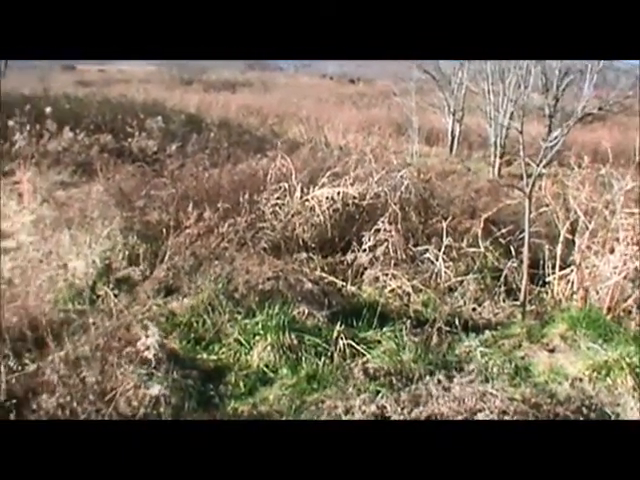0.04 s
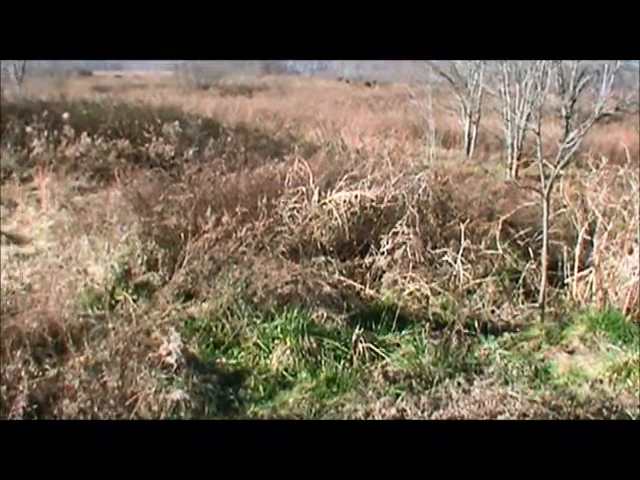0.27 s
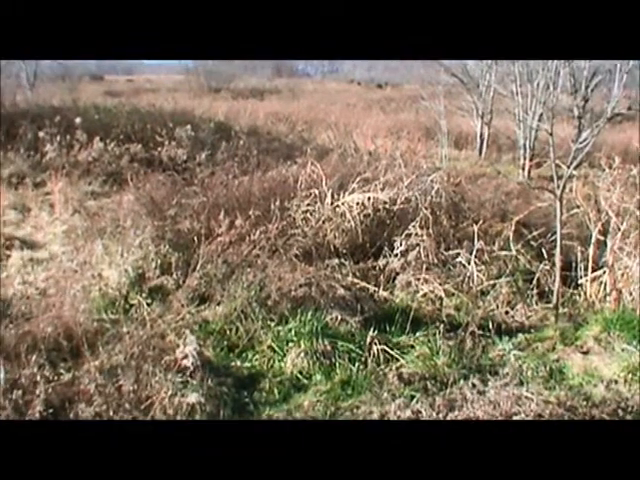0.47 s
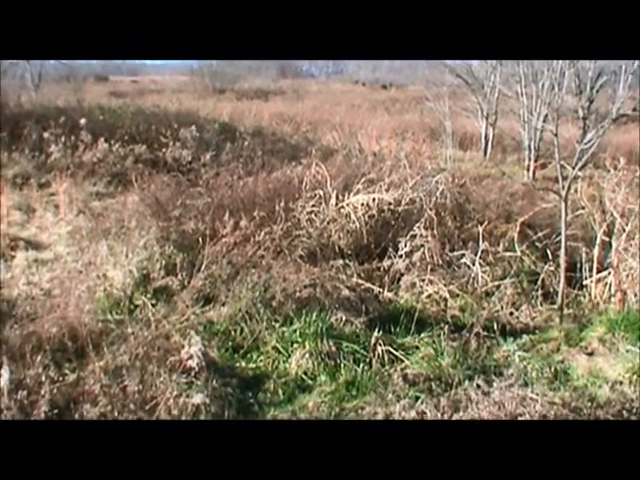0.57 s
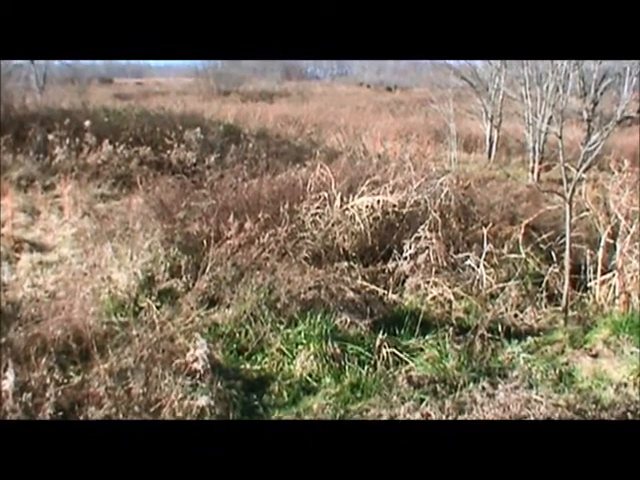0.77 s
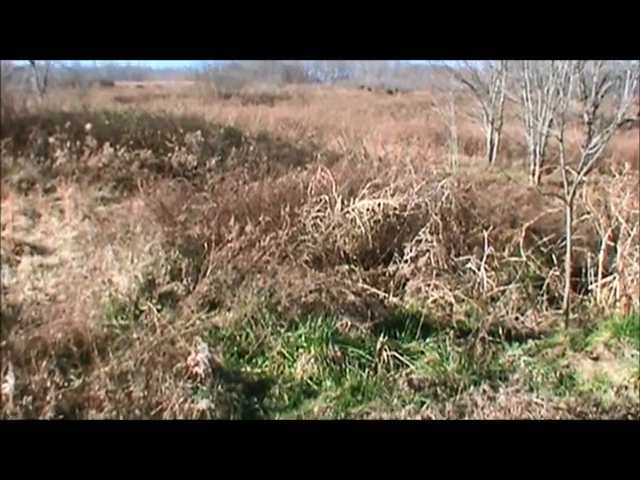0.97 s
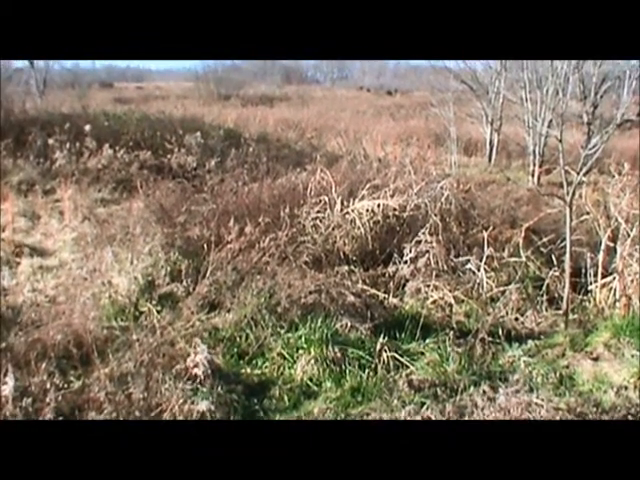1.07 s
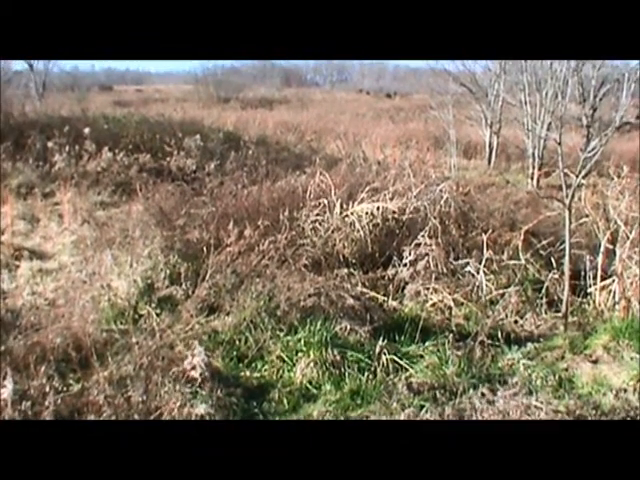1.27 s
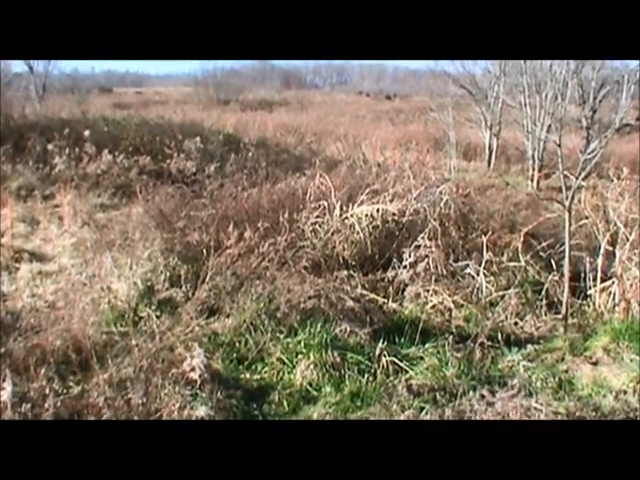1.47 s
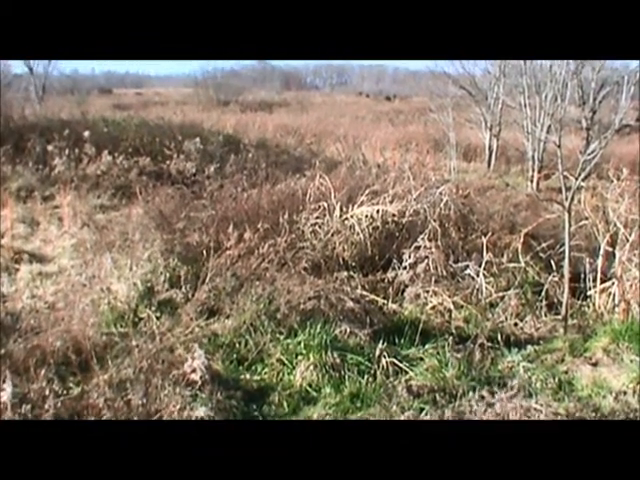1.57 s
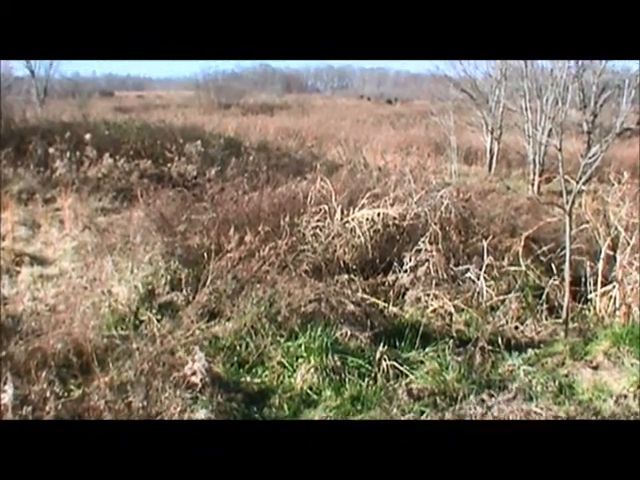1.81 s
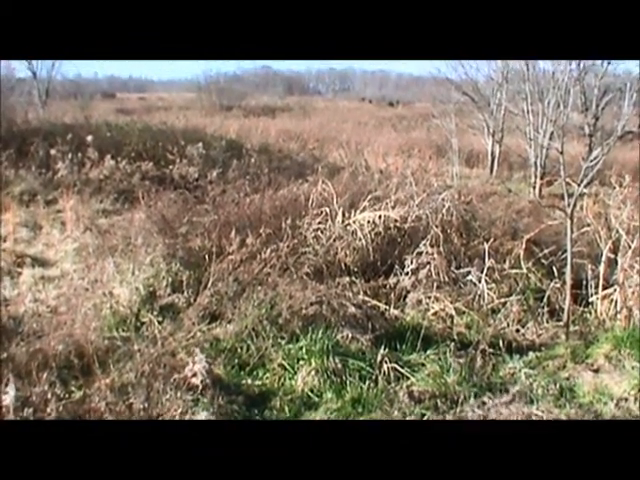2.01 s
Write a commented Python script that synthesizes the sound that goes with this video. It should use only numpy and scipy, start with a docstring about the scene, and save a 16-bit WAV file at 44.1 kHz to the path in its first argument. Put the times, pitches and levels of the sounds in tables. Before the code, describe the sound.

A long hound bawl leads, a rough second dog breaks in, then after a brief lull both bay together twice. Small metal bells clink nearby; outdoor stereo microphone with soft wind, dry grass and faint echo.

```python
"""Two hounds in an open field

Two hounds bay as they work through brush: harmonics and air pulses, filtered by throat and mouth humps.
One holds clear, slowly sinking bawls; the other breaks in with short, hoarse chops.
Collar bells and tags clink as decaying modes; a far bird and soft low thumps are gliding tones.
Shaped noise makes rustling grass and wind on the microphone; scattered taps return a faint echo."""
import sys
import numpy as np
from scipy import signal
from scipy.fft import rfft, irfft
from scipy.io import wavfile

SR = 44100
rng = np.random.default_rng(int(sys.argv[2]) if len(sys.argv) > 2 else 0)


def to_wav(s):
    """Save 16-bit WAV."""
    ch = np.atleast_2d(s).T  # columns
    pcm = np.round(np.clip(ch, -1, 1) * 32767)  # PCM
    wavfile.write(sys.argv[1], SR, pcm.astype(np.int16))


N = 90404  # length [samples]

JITTER_HZ = 130  # rate of the random changes in voices and bells
ATTACK_S, RELEASE_S = .003, .009  # linear ramps of a call; bells rise in half the attack
CLINK_HZ = (4400, 13500)  # band of the clapper ticks and the tag partials
RING_T60_S = .095  # 60 dB decay time of small metal


def amp(db):
    """Decibels are a logarithmic measure: 20 dB is a factor of ten in amplitude."""
    return 10 ** (np.asarray(db) / 20)


def unit(x):
    """Normalization to unit root mean square."""
    return x / np.sqrt(np.mean(x ** 2) + 1e-20)


def add(mix, s, sound):
    """Superposition: the sound sums into the mix from s seconds on."""
    part = mix[max(round(s * SR), 0):][:len(sound)]
    part += sound[:len(part)]


def decay(t, t60):
    """Exponential damping: a fall of 60 dB in t60 seconds."""
    return np.exp(-np.log(1000) * t / t60)


def per_bin(points, **ends):
    """Interpolation on a logarithmic frequency axis, read at every spectral bin."""
    hz, value = np.transpose(points)
    bins_hz = np.fft.rfftfreq(N, 1 / SR)
    return np.interp(np.log(bins_hz + 1), np.log(hz + 1), value, **ends)


def drift(n, hz):
    """Low-pass random modulation: noise under a Gaussian spectrum of width hz."""
    lowpass = np.exp(-(np.fft.rfftfreq(N, 1 / SR) / hz) ** 2)
    return unit(irfft(rfft(rng.standard_normal(N)) * lowpass, N))[:n]


def tract(hz, throat_db, mouth_hz, mouth_db, treble_db):
    """Source-filter principle: gain at hz of the throat and mouth resonances and the treble above them."""
    treble_hz = 2352

    def hump(centre, width):
        return np.exp(-.5 * ((hz - centre) / width) ** 2)

    rasp = amp(-28) * (hz > treble_hz) * treble_hz / (hz + 1)  # thin tail above the treble centre
    treble = hump(treble_hz, 513) + rasp
    throat = amp(throat_db) * hump(604, 77.9)
    return throat + amp(mouth_db) * (hump(mouth_hz, 320.6) + amp(treble_db) * treble)


def hoarse(hz, rough, blur_hz):
    """Aperiodicity rises with frequency: noise share at hz, where harmonics dissolve above blur_hz."""
    return 1 - (1 - rough) / (1 + (hz / blur_hz) ** 6)


def vocal_folds(phase, pitch, rough, shape, flutter, blur_hz):
    """Quasi-periodic phonation: seven harmonics, with sidebands from a slower laryngeal oscillator."""
    flutter_hz = 150.4
    n = len(phase)
    slow = 2 * np.pi * np.cumsum(flutter_hz * (1 + .2 * drift(n, JITTER_HZ))) / SR
    folds = np.zeros(n)
    for k in range(1, 8):
        turn = k * phase + k ** 2  # the square spreads the starting phases
        tonal = np.sqrt(1 - hoarse(k * pitch, rough, blur_hz) ** 2)
        folds += tonal * tract(k * pitch, *shape) * np.cos(turn)
        for side in (-1, 1):
            depth = side * flutter / 2 * np.sqrt(1 - rough ** 2)
            folds += depth * tract(k * pitch + side * flutter_hz, *shape) * np.cos(turn + side * slow)
    return folds


def breath(phase, pitch, rough, t, shape, blur_hz):
    """Glottal turbulence: noise pulsing once per pitch period passes the moving tract."""
    n = len(t)
    puffs = unit(1 + np.cos(phase)) * rng.standard_normal(N)[:n]
    puffs *= np.sqrt(SR / 2 / pitch)  # balances noise against the spacing of the harmonics
    hz, frames, z = signal.stft(puffs, SR, nperseg=512)
    frame_shape = [np.interp(frames, t, c) for c in shape]
    z *= hoarse(hz[:, None], np.interp(frames, t, rough), blur_hz)
    z *= tract(hz[:, None], *frame_shape)
    return signal.istft(z, SR)[1][:n]


def call(curve, treble, onset_rough, held_rough, settle_s, jitter, flutter, blur_hz):
    """Phonation onset: the noise share moves from its onset value to its held one; returns start and sound."""
    times, *columns = np.transpose(curve)
    s = np.arange(times[0], times[-1], 1 / SR)
    t, n = s - s[0], len(s)
    pitch, *shape = [np.interp(s, times, c) for c in columns]
    shape.append(np.interp(s, *np.transpose(treble)))
    settling = np.exp(-(t / settle_s) ** 2)
    rough = np.clip(held_rough + (onset_rough - held_rough) * settling, 0, 1)
    phase = 2 * np.pi * np.cumsum(pitch * (1 + jitter * drift(n, JITTER_HZ))) / SR
    folds = vocal_folds(phase, pitch, rough, shape, flutter, blur_hz)
    air = breath(phase, pitch, rough, t, shape, blur_hz)
    gate = np.minimum(t / ATTACK_S, 1) * np.minimum((t[-1] - t) / RELEASE_S, 1)
    unsteady = amp(2 * rough * drift(n, JITTER_HZ / 2))  # rough voice wavers in level
    return s[0], gate * unsteady * (np.sqrt(2) * folds + air)


def bawling_hound():
    """Nearly periodic phonation: a brief rough onset settles into clear, long bawls."""
    # One curve per call: (time [s], pitch [Hz], throat resonance [dB],
    # mouth resonance [Hz], mouth resonance [dB])
    bawls = [
        [(.225, 606.2, -16.5, 1510, -25), (.25, 515.5, -12.5, 1330, -23), (.31, 506.5, -8, 1250, -22.5),
         (.365, 507.4, -10, 1380, -21), (.44, 497, -12, 1200, -28), (.57, 489.8, -18.5, 1080, -24),
         (.675, 484.7, -11.5, 1192, -19.5), (.88, 424.9, -14.5, 1110, -27)],
        [(1.165, 486.6, -22, 1230, -22.5), (1.255, 501, -18, 1020, -18.5), (1.39, 483.8, -18, 1080, -29),
         (1.435, 459.5, -19.5, 1230, -37.5)],
        [(1.61, 547.7, -12.5, 1355, -22.5), (1.66, 508.4, -18.5, 1104, -15), (1.755, 496, -12.5, 1156, -23),
         (1.818, 446, -22, 1200, -37)],
    ]
    # Treble against the mouth resonance: (time [s], level [dB])
    treble = [(.33, -37), (.43, -9), (.66, -23)]
    out = np.zeros(N)
    for curve in bawls:
        add(out, *call(curve, treble, onset_rough=.87, held_rough=.12, settle_s=.026,
                       jitter=.0043, flutter=.31, blur_hz=2400))
    return out


def chopping_hound():
    """Irregular phonation: strong pitch jitter and lasting noise make short, hoarse chops."""
    # One curve per call: (time [s], pitch [Hz], throat resonance [dB],
    # mouth resonance [Hz], mouth resonance [dB])
    chops = [
        [(.682, 672.2, -11, 1398, -31), (.70, 704.7, -4.5, 1610, -25.5), (.713, 545.4, -5, 1430, -17),
         (.737, 543.9, -4, 1250, -23.5), (.805, 591.3, -11.5, 1220, -14.5), (.831, 627.2, -14.5, 1230, -12.5),
         (.85, 510, -5, 1290, -8)],
        [(1.157, 620.2, -32, 1894, -31.5), (1.18, 585.6, -19.5, 1610, -19.5), (1.21, 523.4, -10.5, 1100, -11),
         (1.24, 569.6, -9, 1220, -22), (1.262, 521.4, -14.5, 1080, -15.5), (1.297, 578, -17, 1190, -10.5),
         (1.32, 530, -9.5, 1180, -41)],
        [(1.60, 543.7, -68, 1077, -20.5), (1.615, 596.4, -24, 1330, -17), (1.64, 566.5, -17.5, 1380, -16),
         (1.686, 551.6, -11, 1060, -21), (1.73, 543.4, -20, 1090, -14), (1.79, 580, -22.5, 1240, -68)],
    ]
    treble = [(0, -16)]  # constant, dB against the mouth resonance
    out = np.zeros(N)
    for curve in chops:
        add(out, *call(curve, treble, onset_rough=.8, held_rough=.27, settle_s=.075,
                       jitter=.03, flutter=.22, blur_hz=2900))
    return out


def strike(t, modes, upper_db):
    """Modal excitation: a clapper tick and damped modes; a detuned twin of the lowest beats and hums on."""
    tick_db, tick_s = 3, .0047
    twin_spread_hz, hum_t60_s = 17.1, .26
    (hum_hz, hum_db), *upper = modes
    tick = signal.lfilter(*signal.butter(2, CLINK_HZ, 'band', fs=SR), rng.standard_normal(len(t)))
    ring = amp(tick_db + upper_db) * np.exp(-t / tick_s) * tick
    ring += amp(hum_db) * decay(t, RING_T60_S) * np.sin(2 * np.pi * hum_hz * t)
    twin_hz = hum_hz + twin_spread_hz * rng.standard_normal()
    ring += amp(hum_db) * decay(t, hum_t60_s) * np.sin(2 * np.pi * twin_hz * t)
    for hz, db in upper:
        hard, damp, tune = rng.standard_normal(3)  # each strike differs
        fade = decay(t, RING_T60_S * amp(2 * damp))
        tone = np.sin(2 * np.pi * hz * (1 + .00475 * tune) * t)
        ring += amp(db + upper_db + 2 * hard) * fade * tone
    return ring


def bell(modes, strikes):
    """Repeated impact: every strike sets the modes ringing anew."""
    t, out = np.arange(SR // 2) / SR, np.zeros(N)
    for s, level_db, upper_db in strikes:
        ring = strike(t, modes, upper_db)
        chatter = amp(2 * drift(len(t), JITTER_HZ))  # the loose clapper stays against the shell
        rise = np.minimum(t / ATTACK_S * 2, 1)
        add(out, s, amp(level_db) * chatter * rise * ring)
    return out


def low_bell():
    """Inharmonic shell modes above a low one, struck often."""
    # Modes: (frequency [Hz], level [dB])
    modes = [(2915, 6.5), (6205, -10), (7400, -5), (9565, -4), (10510, -6)]
    # Clapper strikes: (time [s], level [dB], tick and upper modes [dB])
    strikes = [(0.0, -46.5, -20), (0.198, -42.5, -16), (0.2444, -30.5, -0.5), (0.365, -40.5, 9),
               (0.8163, -37.5, 3), (0.926, -40, -9), (1.027, -41.5, -2), (1.052, -36, 0.5),
               (1.102, -40.5, -14), (1.237, -45.5, 18), (1.538, -42.5, 8), (1.67, -32.5, 0),
               (1.753, -31.5, 2), (1.856, -41, 14), (1.985, -34, -10)]
    return bell(modes, strikes)


def high_bell():
    """Inharmonic shell modes of a second, slightly higher bell, struck rarely."""
    # Modes: (frequency [Hz], level [dB])
    modes = [(3040, 3.5), (5350, -7.5), (7640, -13.5), (10690, -1.5), (12880, -11)]
    # Clapper strikes: (time [s], level [dB], tick and upper modes [dB])
    strikes = [(0.473, -40, 3.7), (1.005, -36.5, 3), (1.362, -41.5, 12.5), (1.398, -34.5, 8)]
    return bell(modes, strikes)


def tags():
    """Random impacts: collar tags rattle, each small tick ringing its own pair of partials."""
    ticks_per_s, loudest_db = 50, -42.5
    t, out = np.arange(SR // 10) / SR, np.zeros(N)
    for when, size, *tunes in rng.random((round(ticks_per_s * N / SR), 4)):
        ring = np.zeros(len(t))
        for u in tunes:
            hz = np.interp(np.sqrt(u), [0, 1], CLINK_HZ)  # the root favours high partials
            ring += np.sin(2 * np.pi * hz * t)
        level = amp(loudest_db + 10 * (size - 1))
        add(out, when * N / SR, level * decay(t, RING_T60_S) * ring)
    return out


def glides(starts, from_hz, to_hz, db):
    """Linear frequency sweep under a half-sine envelope."""
    glide_s = .049
    t, out = np.arange(0, glide_s, 1 / SR), np.zeros(N)
    swell = np.sin(np.pi * t / glide_s)
    for s in starts:
        add(out, s, amp(db) * swell * signal.chirp(t, from_hz, glide_s, to_hz))
    return out


def low_thumps():
    """Falling low-frequency sweeps, heard as soft thumps."""
    return glides([.94, .98, 1.81], from_hz=227, to_hz=131, db=-38)


def far_bird():
    """Falling high-frequency sweeps, heard as faint chirps."""
    return glides([1, 1.915], from_hz=4650, to_hz=3940, db=-50)


def echo(x):
    """Diffuse scattering: sparse decaying taps from brush and trees, mostly mid-range."""
    taps_per_s, rise_s, t60_s = 1500, .025, .43
    t = np.arange(SR) / SR
    taps = rng.standard_normal(SR) * (rng.random(SR) < taps_per_s / SR)
    taps *= np.minimum(t / rise_s, 1) * decay(t, t60_s)
    band = signal.butter(1, [834, 4440], 'band', fs=SR)
    taps = signal.lfilter(*band, taps / np.linalg.norm(taps))
    return amp(-11.5) * signal.fftconvolve(x, taps)[:N]


def ports(x):
    """Inter-channel phase difference: two microphone ports hear one sound slightly out of phase."""
    # Phase by which left leads: (frequency [Hz], phase [rad])
    lead = [(0, 0), (260, -0.92), (1810, -0.28)]
    turn = np.exp(.5j * per_bin(lead) * np.array([[1], [-1]]))
    return irfft(rfft(x) * turn, N)


def hiss(spectrum, likeness):
    """Partial coherence: mid and side noises mix into two channels of the given correlation."""
    colour = amp(per_bin(spectrum, right=-100))
    mid, side = irfft(rfft(rng.standard_normal((2, N))) * colour, N)
    c = np.clip(likeness, -1, 1)
    return unit(np.sqrt(1 + c) * mid + np.sqrt(1 - c) * side * np.array([[1], [-1]]))


def open_air():
    """Common modulation: one breeze drives the microphone rumble and the wash of rustling grass."""
    # Noise spectra: (frequency [Hz], relative density [dB per Hz])
    wind = [(12, -12), (25, 1.5), (65, 8.5), (130, -6), (250, -14.5)]
    field = [(250, -2), (550, 3.5), (3500, -5), (11000, -7.5), (16000, -15.5)]
    # Breeze strength: (time [s], level [dB])
    gusts = [(0, -2), (.75, 4), (2.05, -0.5)]
    breeze = np.interp(np.arange(N) / SR, *np.transpose(gusts))
    rumble = hiss(wind, likeness=-.23) * amp(-40 + breeze + 2 * drift(N, 38))
    rustle = hiss(field, likeness=.72) * amp(-45 + breeze + drift(N, 15))
    return rumble + rustle


def scene():
    """Linear superposition: direct sources and their echo reach both ports, over the open air."""
    direct = bawling_hound() + chopping_hound()
    direct += low_bell() + high_bell() + tags()
    direct += low_thumps() + far_bird()
    return ports(direct + echo(direct)) + open_air()


def record(dry):
    """Saturation, then band limitation: the loudest peaks round off before a low-pass filter."""
    held = dry / (1 + dry ** 8) ** (1 / 8)
    lowpass = signal.firwin(511, 16100, window=("kaiser", 9), fs=SR)  # cutoff in Hz
    return signal.oaconvolve(held, lowpass[None], "same")


dry = scene()
out = record(dry)
to_wav(out)
```